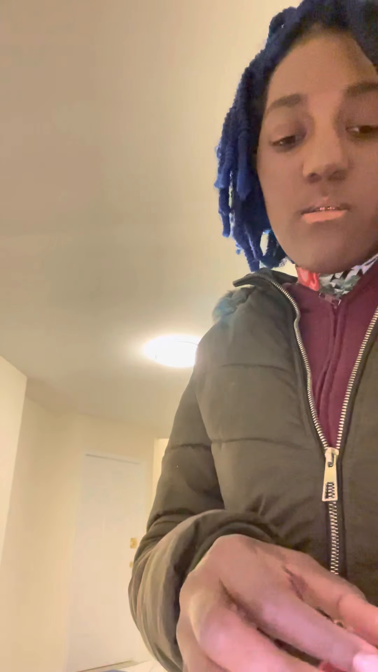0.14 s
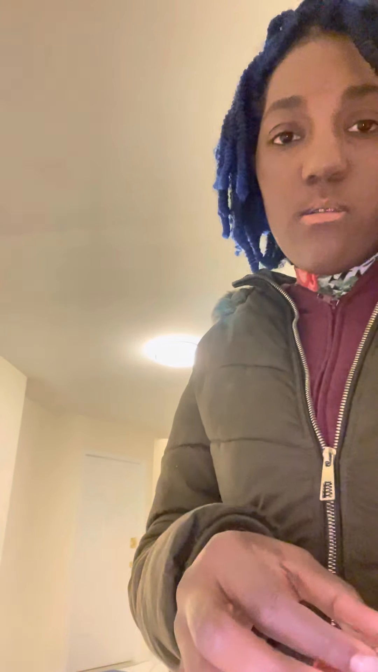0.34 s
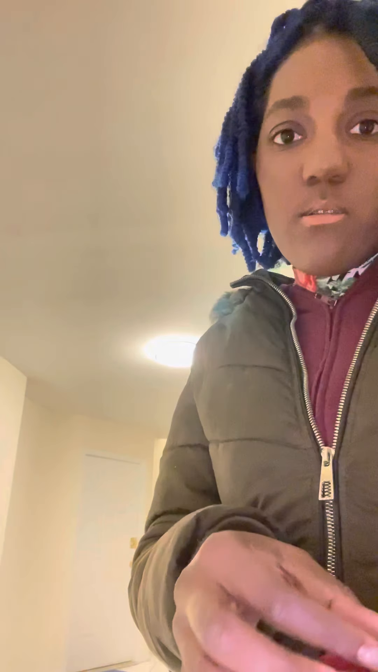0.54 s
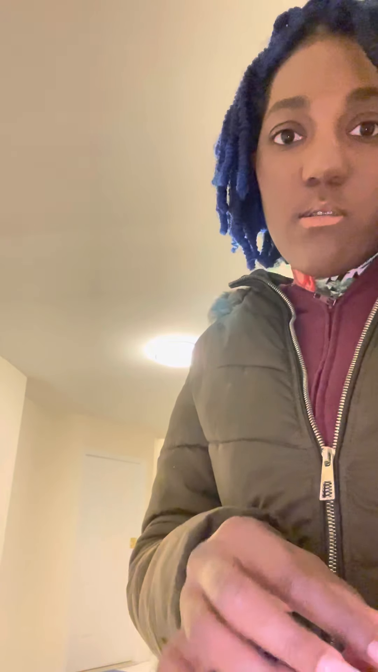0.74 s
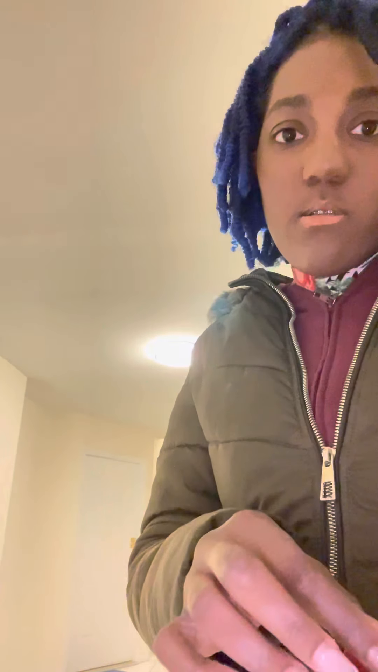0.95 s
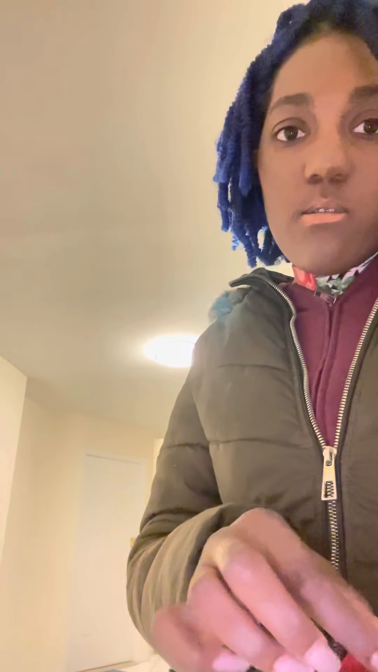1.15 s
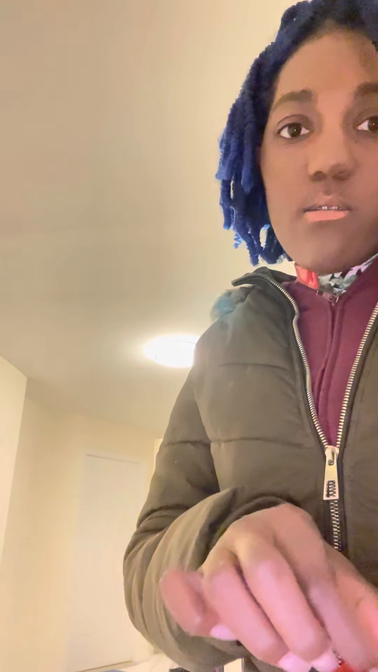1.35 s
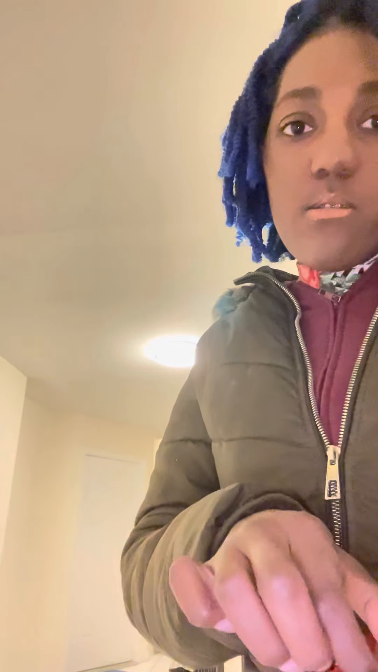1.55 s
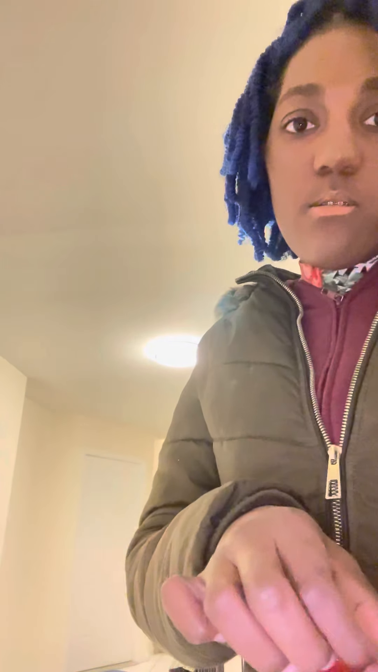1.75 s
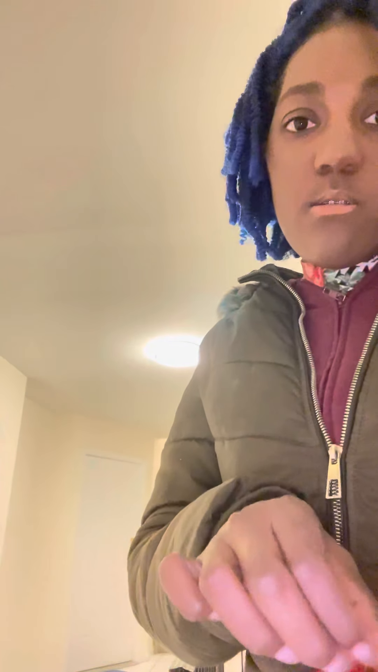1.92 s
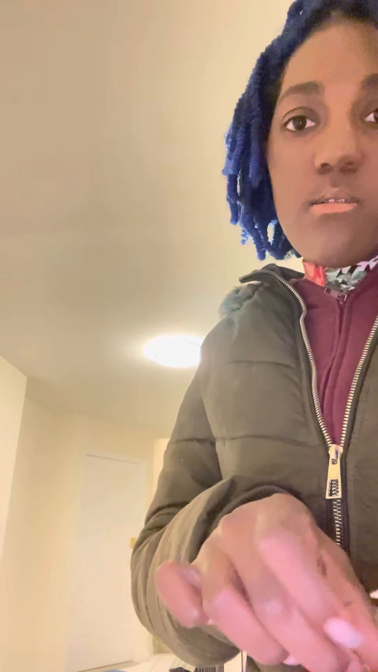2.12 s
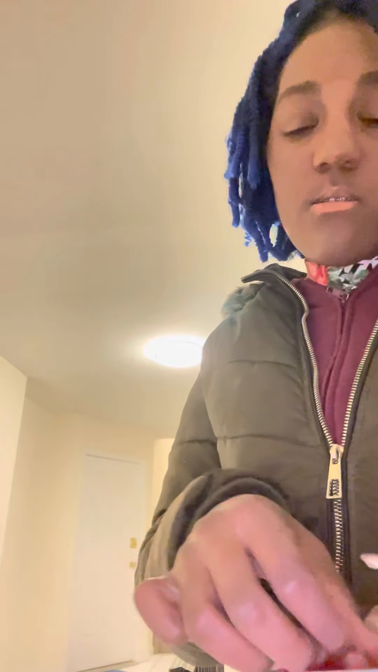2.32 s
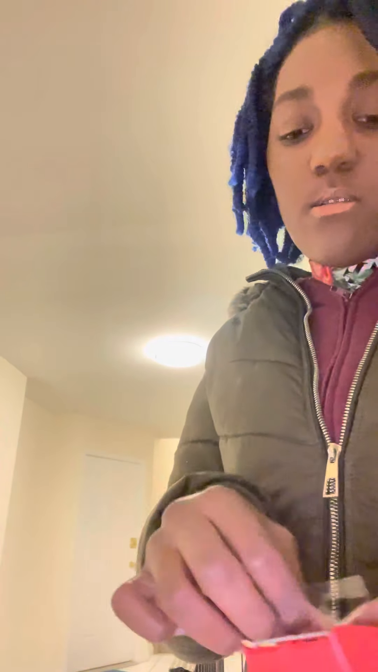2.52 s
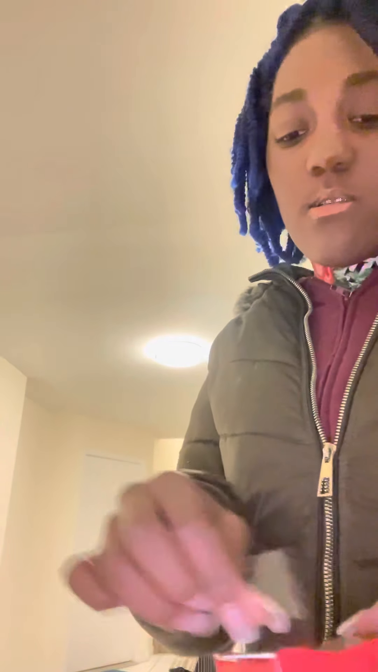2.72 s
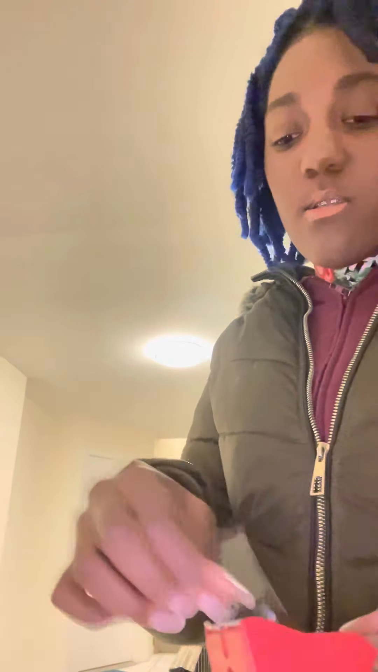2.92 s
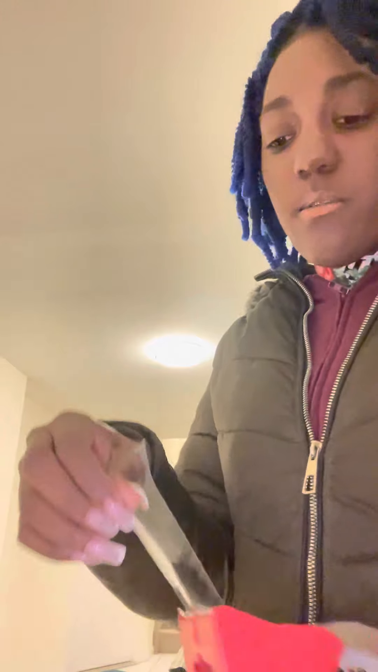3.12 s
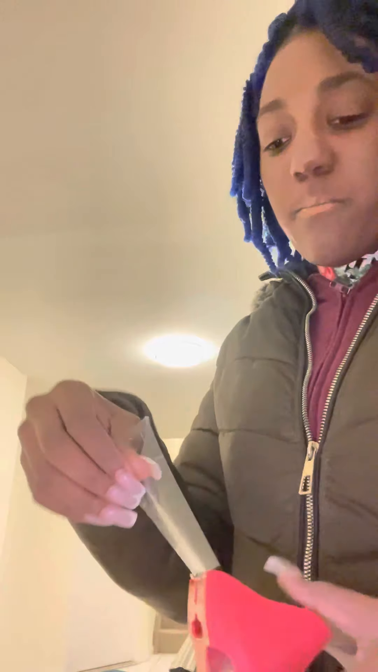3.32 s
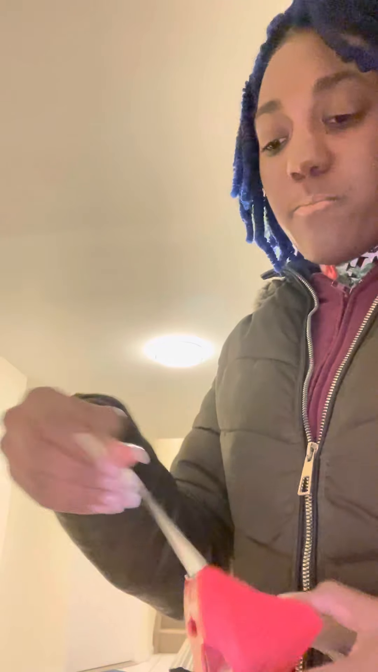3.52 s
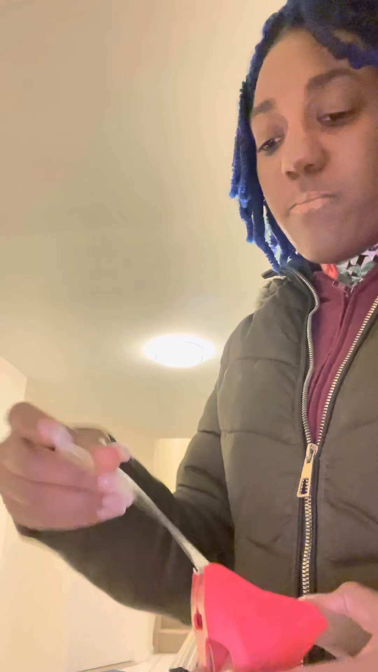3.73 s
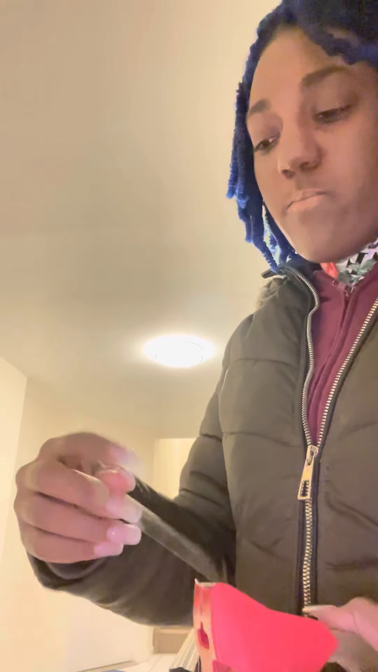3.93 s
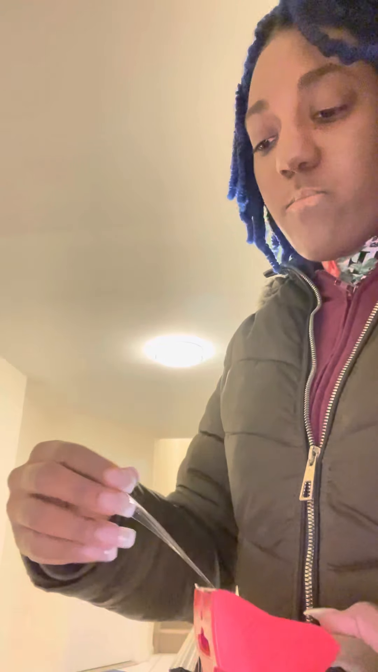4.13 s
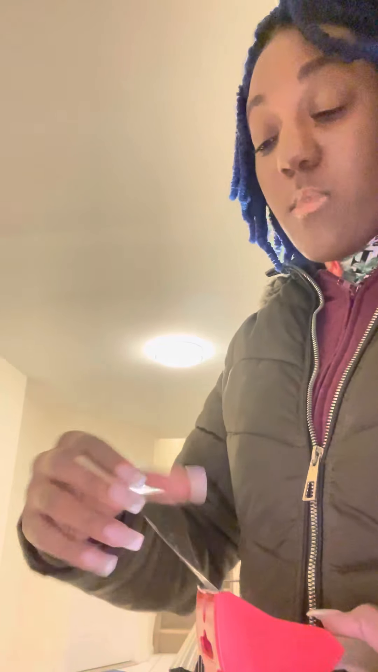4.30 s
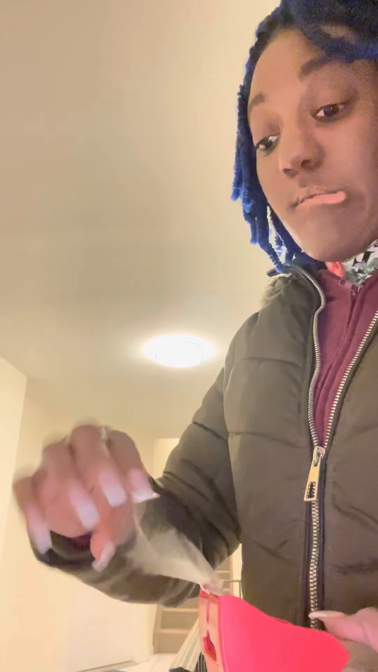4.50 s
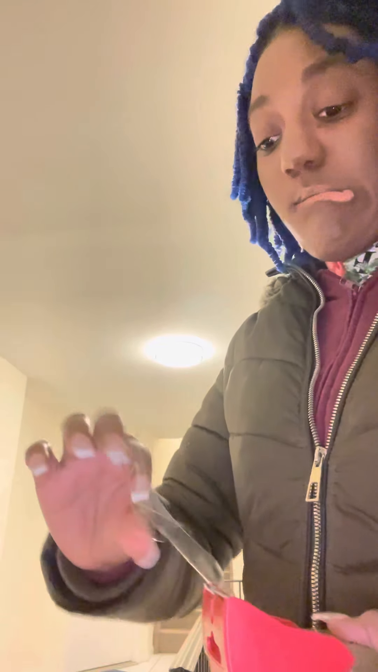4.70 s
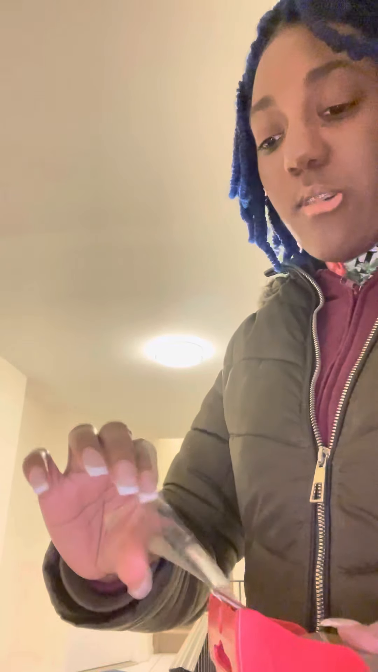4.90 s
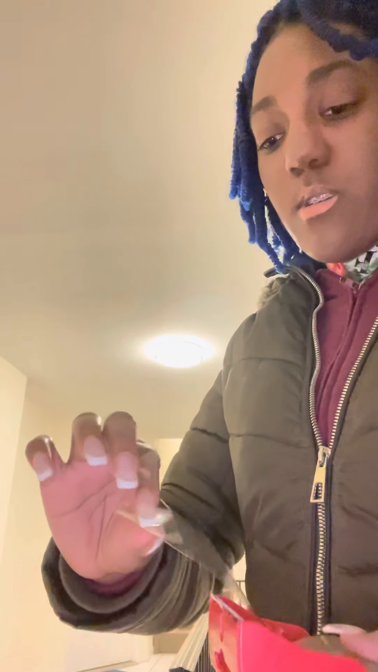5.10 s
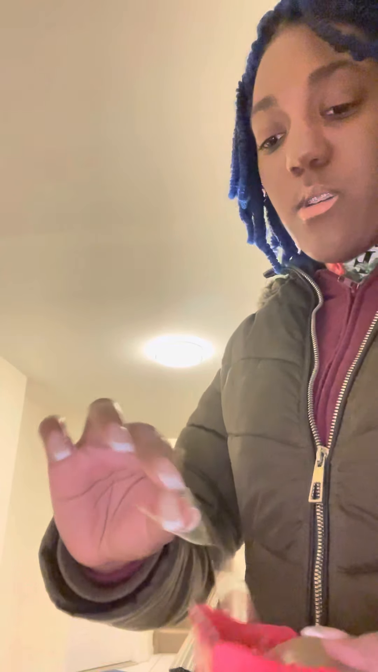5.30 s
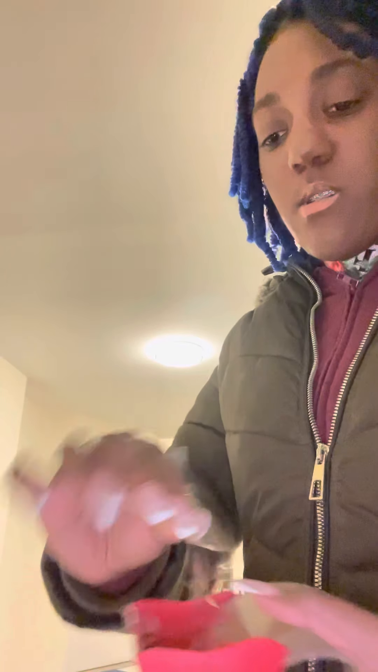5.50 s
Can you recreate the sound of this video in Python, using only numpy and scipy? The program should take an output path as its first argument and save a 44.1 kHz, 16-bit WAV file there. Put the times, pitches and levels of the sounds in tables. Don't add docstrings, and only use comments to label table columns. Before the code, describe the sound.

Sparse plastic clicks and soft film rustle lead to short harsh tape rips, one more hard jerk, then quiet crinkling and small snaps.

```python
import sys
import numpy as np
from scipy import signal
from scipy.fft import rfft, irfft, next_fast_len
from scipy.io import wavfile
from scipy.ndimage import uniform_filter1d, minimum_filter1d

SR = 44100
rng = np.random.default_rng(int(sys.argv[2]) if len(sys.argv) > 2 else 0)


def put_to_file(sound):
    columns = np.atleast_2d(sound).T
    safe = np.clip(columns, -1, 1)
    whole_steps = np.round(safe * 32767)
    wavfile.write(sys.argv[1], SR, whole_steps.astype(np.int16))


def amplitude_ratio(level_db):
    exponent = np.asarray(level_db, float) / 20
    return 10 ** exponent


N = 244747

# frequency in Hz, level in dB per Hz.
FILM_COLOUR = [(410, -27.5), (700, -8.5), (1180, -17), (1800, -11.5), (2160, -12.5), (2430, -12),
               (2730, -13), (4320, -5.5), (4920, -11.5), (5690, -8.5), (6320, -13), (7990, -8.5),
               (11400, -9.5), (15200, -15), (16000, -15.5)]
# frequency in Hz, width in Hz, level in dB.
SHELL_MODES = [(468, 55, -1), (468, 12, -5), (575, 60, -2), (350, 60, -8), (670, 90, -7), (240, 120, -14)]
# frequency in Hz, width in Hz, level in dB.
RIB_MODES = [(2523, 71, -0.5), (3790, 240, -11), (5330, 600, -4)]
SPLIT_HZ, EDGE_HZ = 5200, 17500
LIFT_S, HELD_PITCH = 4.15, .86


def shape(x, table):
    size = next_fast_len(x.shape[-1])
    hz, db = np.transpose(table)
    bins_hz = np.arange(size // 2 + 1) * SR / size
    gain = amplitude_ratio(np.interp(np.log(bins_hz + 1), np.log(hz), db))
    return irfft(rfft(x, size) * gain, size)[..., :x.shape[-1]]


def ring(x, modes):
    return sum(amplitude_ratio(db) * signal.lfilter(*signal.iirpeak(hz, hz / max(width, 10.), SR), x)
               for hz, width, db in modes)


def retune(modes, factor):
    return [(hz * factor, width, db) for hz, width, db in modes]


def band(x, lo_hz, hi_hz):
    return signal.sosfilt(signal.butter(3, [lo_hz, min(hi_hz, SR / 2.2)], "band", fs=SR, output="sos"), x)


def unit(x):
    return x / np.sqrt(np.mean(x ** 2))


def peak_at(x, db):
    return amplitude_ratio(db) * x / np.abs(x).max()


def walk(rate):
    k = int(SR / rate)
    held = np.repeat(rng.standard_normal(N // k + 1), k)[:N]
    return unit(uniform_filter1d(uniform_filter1d(held, k), k))


def curve(rows):
    s, *columns = np.transpose(rows)
    return [np.interp(np.arange(N) / SR, s, c) for c in columns]


def air():
    # time in seconds, drone level in dB rms.
    hum = [(0., -53.5), (.6, -53.5), (2., -54.5), (2.7, -56.5), (3.6, -60), (5.55, -60.5)]
    # frequency in Hz, level in dB per Hz.
    hiss_colour = [(15, -44), (25, -29.5), (97, -6.5), (190, 7), (476, 0.5), (887, -25.5), (2220, -5),
                   (2760, -18), (4140, -27.5), (4870, -28), (8140, -34), (13200, -44.5), (16000, -54.5)]
    hiss_db, waver_db, upper_db = -60, 2.5, -1
    db, = curve(hum)
    low_gain = amplitude_ratio(db + waver_db * walk(17))
    drone = low_gain * unit(ring(rng.standard_normal(N), [(56.6, 8.5, 0)]))
    upper_gain = amplitude_ratio(db + upper_db + waver_db * walk(17))
    drone = drone + upper_gain * unit(ring(rng.standard_normal(N), [(104.6, 27, -2.5), (342, 44, -10.5)]))
    hiss = shape(rng.standard_normal((2, N)), hiss_colour)
    hiss = amplitude_ratio(hiss_db - 6) * hiss / np.std(band(hiss[0], 220, 16000))
    return band(hiss, 40, EDGE_HZ) + band(drone, 57, 500) * np.array([[1], [0]])


def room(x):
    # frequency in Hz, time to fall 60 dB in seconds.
    walls = [(300, 0.83), (1000, 1), (3000, 0.85), (6000, 0.27), (12000, 0.38)]
    room_db, desk_db = -19.5, -7
    size = SR
    t = np.arange(size) / SR
    hz, t60 = np.transpose(walls)
    tail = 0
    for centre in 150 * 2. ** np.arange(0, 7):
        decay = amplitude_ratio(-60 * t / np.interp(np.log(centre), np.log(hz), t60))
        top = centre * np.sqrt(2) ** (1 + (centre > 9000))
        tail = tail + decay * band(rng.standard_normal((2, size)), centre / np.sqrt(2), top)
    tail = tail * (1 - np.exp(-t / 0.0023))
    tail = amplitude_ratio(room_db) * tail / np.sqrt(np.sum(tail[0] ** 2))
    desk = band(rng.standard_normal((2, size)), 250, 5500) * np.exp(-t / .004)
    tail = tail + amplitude_ratio(np.array([[-15.], [-7.5]]) + desk_db) * desk / np.sqrt(np.sum(desk[0] ** 2))
    return signal.fftconvolve(x[None], tail, axes=1)[:, :N]


def crackle(spread_db, throb_db, rate):
    level_db = spread_db * rng.exponential(size=N) + throb_db * walk(rate)
    return unit(rng.standard_normal(N) * amplitude_ratio(level_db))


def roll():
    # frequency in Hz, width in Hz, level in dB.
    roll_modes = [(468, 16, 0), (560, 43, -6), (399.5, 82, -7.5)]
    times = 2.45, 2.72, 3.25, 3.42
    db = -48.5 + np.interp(np.arange(N) / SR, times, [-16.5, 0, 0, -16.5], -200, -200)
    return amplitude_ratio(db) * unit(band(ring(crackle(1.6, 2.5, 40), roll_modes), 210, 900))


def knocks():
    # start in seconds, peak level in dB, ring in Hz.
    bumps = [(0.571, -32.5, 418), (1.4185, -46, 583), (2.0601, -33, 540), (2.4474, -34, 620),
             (2.693, -16.5, 468), (2.802, -30.5, 468), (4.2, -50, 467), (4.528, -39.5, 467),
             (4.645, -38, 391), (4.733, -35, 483)]
    push_ms, thump_width_hz, after_width_hz, after_db = 4.7, 58, 16, -4
    out, t = np.zeros(N + 12000), np.arange(12000) / SR
    push = np.sin(np.pi * np.clip(t * 3000 / push_ms, 0, 1)) ** 2
    for s, db, hz in bumps:
        thump = ring(push, [(hz, thump_width_hz, 0)])
        after = ring(push, [(hz, after_width_hz, 0)])
        i = int(s * SR)
        out[i:i + len(t)] += peak_at(peak_at(thump, 0) + peak_at(after, after_db), db)
    return out[:N]


def tape(snaps, colour, peel_db, hollow_db, bright_db):
    film = shape(snaps, colour)
    middle, top = unit(band(film, 800, SPLIT_HZ)), unit(band(film, SPLIT_HZ, EDGE_HZ))
    hollow = unit(band(ring(snaps, SHELL_MODES), 120, 2035))
    return amplitude_ratio(peel_db) * middle + amplitude_ratio(bright_db) * top + amplitude_ratio(hollow_db) * hollow


def rustle():
    # time in seconds, effort in dB rms, film tautness in dB.
    effort = [(0., -52.5, -1.5), (.3, -71, -21), (.6, -56.5, -0.5), (.86, -58.5, -6), (1., -71.5, -5.5),
              (1.25, -62.5, 7.2), (1.45, -58.5, 2), (1.7, -68, -1), (2., -61.5, -10), (2.5, -47.5, -5),
              (3.17, -42, -10.5), (3.4, -53, -17), (4.05, -74.5, -2), (4.75, -57, -3.5), (5., -56, -1.5),
              (5.08, -64.5, -13.5), (5.3, -66, -11.5), (5.4, -55.5, -1.5)]
    # frequency in Hz, level in dB per Hz.
    soft_colour = [(410, -30), (700, -9), (875, 4), (1440, 0.5), (1750, 1), (1920, -0.5), (2190, -2),
                   (2770, 0.5), (3640, -2.5), (3990, 0), (4990, -7.5), (10400, -16), (16000, -33)]
    peel_db, taut_db = curve(effort)
    snaps = crackle(1.8, 1.5, 30)
    held = np.arange(N) / SR > LIFT_S
    rib = np.where(held, ring(snaps, retune(RIB_MODES[:1], HELD_PITCH)), ring(snaps, RIB_MODES[:1]))
    film = tape(snaps, soft_colour, peel_db, peel_db - 4.5, peel_db + taut_db + 2.5 * walk(18))
    rib = amplitude_ratio(peel_db - 13 + 3.5 * walk(7)) * unit(rib)
    sheen = amplitude_ratio(peel_db + taut_db - 10.5) * unit(ring(snaps, [(5647, 1400, 0)]))
    return film + rib + sheen


def ticks(rows):
    lead_ms, lead_db = 1.45, -29.5
    snap_db, rib_scatter_db = 16.5, 8.5
    sheen_ms = 5.5
    size = 6000
    out, t = np.zeros(N + size), np.arange(size) / SR
    for (s, db, hz, hollow_db, bright_db, ms), snaps in zip(rows, rng.standard_normal((len(rows), 2, size))):
        since_ms = t * 1000 - 8
        age = np.maximum(since_ms, 0) / max(ms, .2)
        lead = amplitude_ratio(lead_db) * np.exp(np.minimum(since_ms, 0) / lead_ms) * np.exp(-age)
        creak = amplitude_ratio(-24.5) * (1 - np.exp(-age)) * np.exp(-t / 0.014)
        swell = lead + age ** 2 * np.exp(-3.0 * age) + creak
        spray = snaps[0] * amplitude_ratio(6.35 / max(ms, 1.5) * np.minimum(snaps[1] ** 2, 5)) * swell
        spray[np.argmax(swell)] += amplitude_ratio(snap_db) * swell.max() / max(ms, 1)

        ribs = ring(spray, retune(RIB_MODES, HELD_PITCH if s > LIFT_S else 1))
        ribs = amplitude_ratio(rib_scatter_db * snaps[1, 1] - 2.0) * ribs
        patch = band(ring(spray, [(hz, 350, 0)]) + ribs + amplitude_ratio(-7) * spray, 1250, SPLIT_HZ)
        hollow = band(ring(spray, retune(SHELL_MODES, 1 + 0.029 * snaps[1, 0])), 170, 1000)
        fading = spray * np.exp(-age * ms / (ms + sheen_ms))
        bright = shape(band(fading, SPLIT_HZ, EDGE_HZ), FILM_COLOUR)
        i = max(int((s - .008 - .0005 * ms) * SR), 0)
        out[i:i + size] += peak_at(patch, db) + peak_at(hollow, db + hollow_db) + peak_at(bright, db + bright_db)
    return out[:N]


def fingers():
    # time in seconds, peak in dB, treble in dB.
    taps = [(0.0188, -38, -5), (0.4802, -24.5, 4), (.571, -13.5, -0.5), (0.849, -52, -11), (0.883, -36, -9),
            (.9494, -37, -8), (1.05, -47.5, 2), (1.3511, -53, 17), (1.4181, -19, 11.5), (1.72, -29, -20),
            (1.7538, -18, -4.5), (1.8926, -20.5, 9.5), (1.924, -30, -3), (1.9979, -32, -8),
            (2.0254, -31, 6), (2.0604, -26.5, 12), (2.223, -31.5, -6), (2.2488, -18.5, -6),
            (2.8005, -32, 6)]
    # time in seconds, peak in dB, treble in dB.
    picks = [(0.3084, -36, -3), (0.3255, -32.5, 0), (.38, -29.5, -1.5), (0.4857, -20.5, -5),
             (1.0375, -56, 7), (1.1417, -39.5, 4.5), (1.1522, -32, -12), (1.2179, -25.5, 3),
             (1.394, -36, 3), (1.5893, -41, -8), (1.601, -42, 6), (1.6258, -38.5, 6), (1.728, -40, -2),
             (1.874, -38.5, 2), (1.958, -32.5, 0), (1.988, -45.5, 5.5), (2.167, -44.5, 2.5),
             (2.205, -54, 19), (2.2868, -17.5, -4), (2.3454, -31.5, -2), (2.374, -9, -10), (2.4775, -36, 3),
             (3.268, -49.5, 7.5), (3.283, -48, 9), (3.924, -59, 2.5), (4.8496, -52, 6), (5.1, -65, 8),
             (5.2, -65, 8.5)]
    # time in seconds, peak in dB, ring of the patch in Hz, treble in dB.
    fumbles = [(0.1018, -31.5, 2130, 5.5), (0.7579, -21.5, 1540, -2), (1.299, -53, 4250, 13),
               (2.1823, -29, 1840, -2.5), (2.4486, -17.5, 3700, -1.5), (3.3574, -52, 1295, 13),
               (3.4146, -26.5, 4420, -11), (3.4327, -25.5, 4260, -9), (4.0174, -62, 2240, -5),
               (4.0362, -47, 2296, -5), (4.064, -37.5, 4170, 12.5), (4.0757, -39, 4310, -2),
               (4.1919, -41, 4400, 8), (4.2023, -25, 1703, 1), (4.3425, -44, 2120, 3),
               (4.3842, -36, 4310, 5.5), (4.5027, -60, 2190, -12), (4.5262, -31.5, 2154, 5.5),
               (4.5392, -31, 3790, -8), (4.5806, -25.5, 2100, -8.5), (4.6415, -27.5, 4170, 2.5),
               (4.6553, -37.5, 3930, 4), (4.708, -30.5, 3100, 3), (4.7328, -20.5, 3550, 2),
               (4.7618, -28.5, 2150, 4.5), (5.3424, -39.5, 2164, -21), (5.477, -26, 3900, 1)]
    # time in seconds, peak in dB, ring in Hz, length in ms.
    scrapes = [(0.473, -44, 2550, 7.8), (1.39, -35.5, 2540, 8.4), (1.887, -41, 2500, 8.5),
               (2.022, -39, 3500, 18), (2.051, -25, 2500, 6.8), (2.245, -33, 2500, 4.8),
               (2.365, -32, 3000, 4.3), (2.387, -32.5, 3000, 7.7), (2.551, -12, 1900, 5.2),
               (2.624, -4.5, 2420, 6), (2.874, -33.5, 4000, 2.5), (3.34, -47.5, 4000, 1.43),
               (4.186, -40.5, 3800, 15), (4.511, -39, 2150, 12.7), (4.701, -54, 3200, 11),
               (4.746, -33.5, 2150, 11.5)]
    rib_hz, tick_ms = 2540, 1.6
    return (ticks([(s, db, rib_hz, -15, top, tick_ms) for s, db, top in taps])
            + ticks([(s, db, rib_hz, -28.5, top, tick_ms) for s, db, top in picks])
            + ticks([(s, db, hz, -18, top, tick_ms) for s, db, hz, top in fumbles])
            + ticks([(s, db, hz, -16.5, -9, ms) for s, db, hz, ms in scrapes]))


def rips():
    # start in seconds, hold in seconds, peel in dB rms, sag in dB over the hold, hollow in dB.
    jerks = [
        (2.5518, 0.0065, -11.5, -1.9, -9),
        (2.6252, 0.0052, -10.5, 2.5, -13),
        (2.682, 0.014, -17, 2.5, -10),
        (2.894, .009, -39, -12, -13),
        (2.9039, .012, -14, -2.5, -12.5),
        (2.919, 0.09, -19, 3.5, -8.5),
        (3.467, .063, -14.5, 7, -15),
        (3.532, .016, -26, 7.5, -6.5),
    ]
    # time in seconds, peak in dB.
    slips = [(2.9066, -6.5), (2.915, -0.5), (2.9273, -6.5), (2.9339, -2.5), (2.9465, -5), (2.962, -6.5),
             (3.4763, -2.5), (3.487, -4), (3.492, -5.5), (3.497, -9.5), (3.5015, -4.5), (3.5083, -4),
             (3.5128, -7), (3.5185, -9.5), (3.5285, -6)]
    slip_hz, slip_depth_db = 185, 12
    bite_s, bite_db, creak_s, creak_db = .0015, -20.5, 0.0076, -7.5
    let_go_s, let_go_db, trail_s, trail_db = 0.0038, -17, 0.0047, -18.5
    shell_lag_s, bright_rel_db, dull_db_per_s, chatter_s = 0.0038, -1.5, 51, 2.916
    t = np.arange(N) / SR
    cycle = np.cumsum(slip_hz * (1 + .3 * np.tanh(walk(90)))) / SR % 1
    snaps = crackle(2.0, 1.5, 420)
    snaps = snaps * np.where(t > chatter_s, amplitude_ratio(slip_depth_db * (0.4847 - cycle)), 1)
    keep = np.exp(-1 / (shell_lag_s * SR))
    peel = hollow = bright = 1e-9
    for s, hold, db, sag_db, hollow_db in jerks:
        times = s + np.cumsum([-bite_s - creak_s, creak_s, bite_s, hold, let_go_s, trail_s])
        levels = np.cumsum([bite_db + creak_db, -creak_db, -bite_db, -sag_db, let_go_db, trail_db])
        gain = amplitude_ratio(db + np.interp(t, times, levels, -200, -200))
        held = gain * amplitude_ratio(np.interp(t, times[2:4], [0, sag_db]))
        peel = peel + gain
        bright = bright + gain * (t > times[1]) * amplitude_ratio(bright_rel_db - dull_db_per_s * hold)
        hollow = hollow + amplitude_ratio(hollow_db) * signal.lfilter([1 - keep], [1, -keep], held)
    peel_db, hollow_db, bright_db = 20 * np.log10([peel, hollow, bright])
    hard_slips = ticks([(s, db - 4, 4150, -16, -3, 1.2) for s, db in slips])
    return tape(snaps, FILM_COLOUR, peel_db, hollow_db, bright_db) + hard_slips


def scene():
    # frequency in Hz, lead of the left port in radians.
    ports = [(0, 0), (520, -.2), (860, -1.4), (1250, -.3), (1700, -.9), (2450, -.3), (2760, -1.2),
             (3450, -.2), (4650, -.7), (4900, -3.1), (5100, -4.9), (9000, -4.9), (11000, -6.15),
             (16500, -6.25)]
    # frequency in Hz, left minus right in dB.
    lean = [(100, .3), (300, 3.5), (700, 3), (1200, -.5), (5000, -1), (12000, 0)]
    # frequency in Hz, level in dB.
    apart_colour = [(60, -21.5), (150, -6.5), (350, -14.5), (700, 1), (3000, -0.5), (8000, 8.5),
                    (11000, -15.5), (16000, -26.5)]
    jerks = rips()
    small = fingers() + knocks() + rustle() + roll()
    near = jerks + small
    shared, apart = room(small + amplitude_ratio(3.5) * jerks) + air()
    size = next_fast_len(N)
    hz = np.arange(size // 2 + 1) * SR / size
    twist = np.exp(.5j * np.interp(hz, *np.transpose(ports))) * amplitude_ratio(np.interp(hz, *np.transpose(lean)) / 2)
    both = rfft(near + shared, size)
    apart = shape(apart, apart_colour) * walk(2.7)
    left = irfft(both * twist, size)[:N] + apart
    right = irfft(both / twist, size)[:N] - apart
    return np.array([left, right])


def gate(x):
    start_hz, thin_hz = 4700, 9000
    quiet_db, depth_db, share, shadow_db = -30, -26, .85, -11
    hz, _, z = signal.stft(x, SR, nperseg=512)
    quiet = 10 * np.log10(np.sum(np.abs(z) ** 2, axis=(0, 1)) + 1e-12) < quiet_db
    luck = uniform_filter1d(rng.standard_normal(z.shape[1:]), size=4, axis=0)
    luck = unit(uniform_filter1d(luck, size=9, axis=1))
    odds = share + np.interp(hz, [start_hz, thin_hz], [0, .5], 9)[:, None]
    top_db = 10 * np.log10(np.sum(np.abs(z[:, hz > start_hz]) ** 2, axis=(0, 1)) + 1e-14)
    odds = odds - 1.6 * (top_db + minimum_filter1d(-top_db, size=5) < shadow_db)
    lost = quiet * np.clip((luck - odds) * 4, 0, 1)
    return signal.istft(z * amplitude_ratio(depth_db * lost), SR)[1][:, :N]


def roll_off(x):
    return signal.sosfilt(signal.butter(12, 16970, fs=SR, output="sos"), x)


def record(dry):
    low = signal.sosfilt(signal.ellip(6, .3, 32, 15900, fs=SR, output="sos"), dry)
    mix = gate(np.tanh(low))
    return roll_off(mix)


dry = scene()
out = record(dry)
put_to_file(out)
```